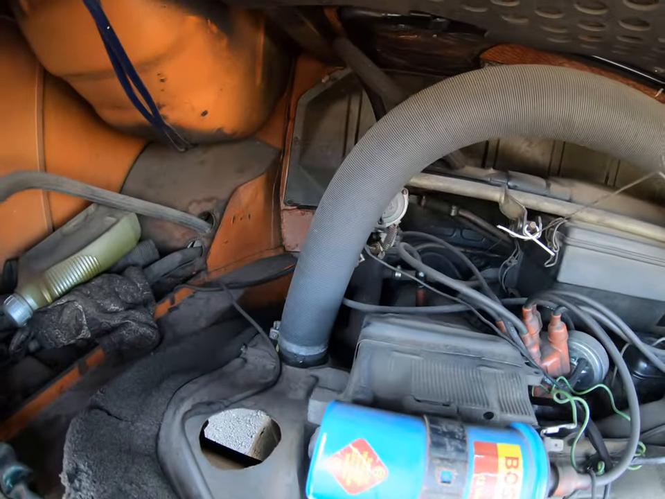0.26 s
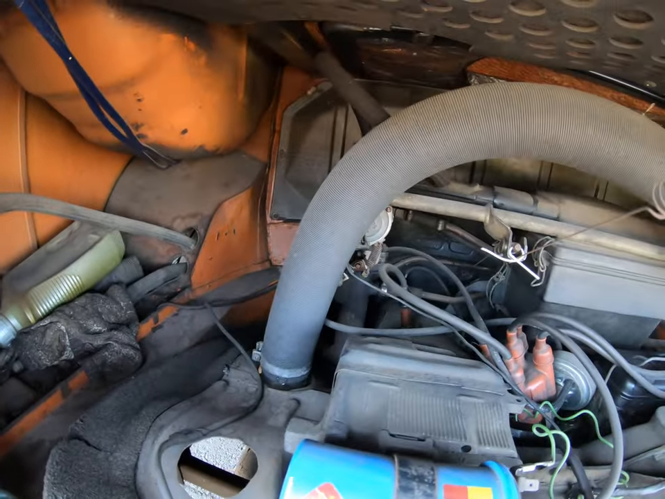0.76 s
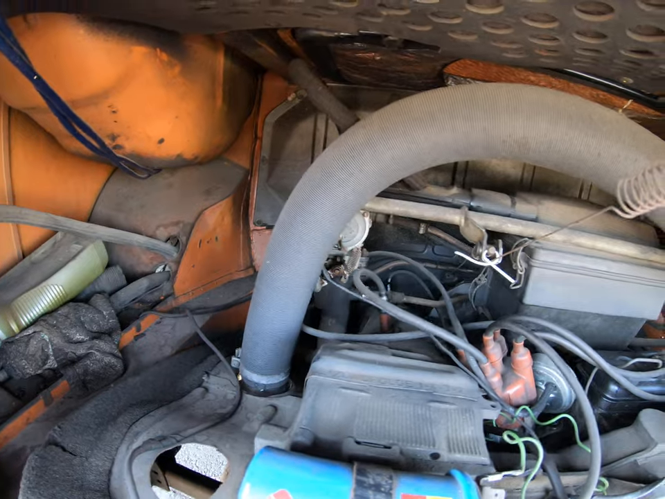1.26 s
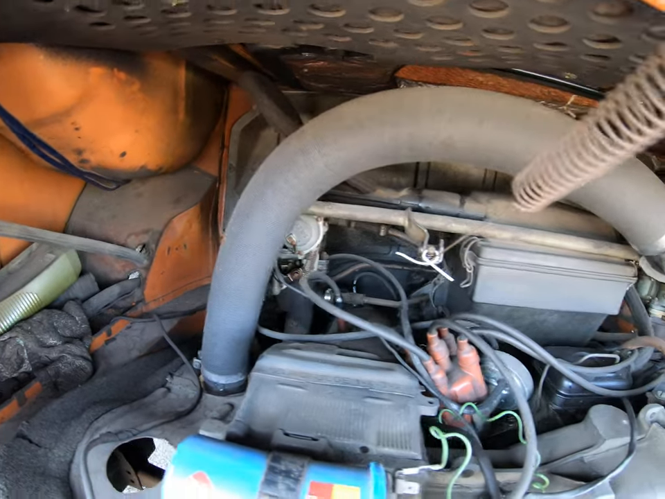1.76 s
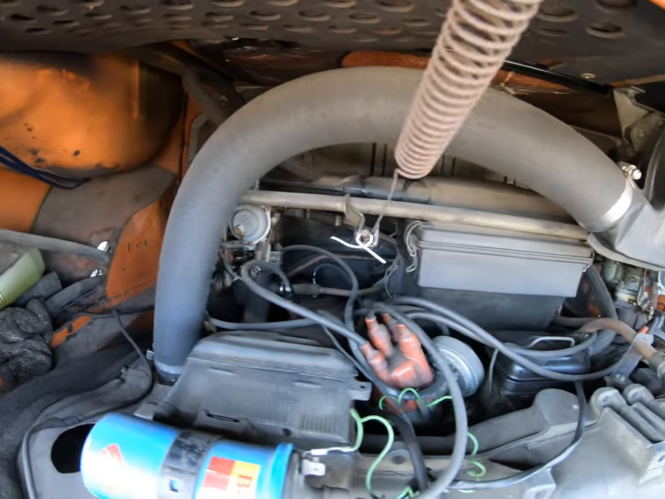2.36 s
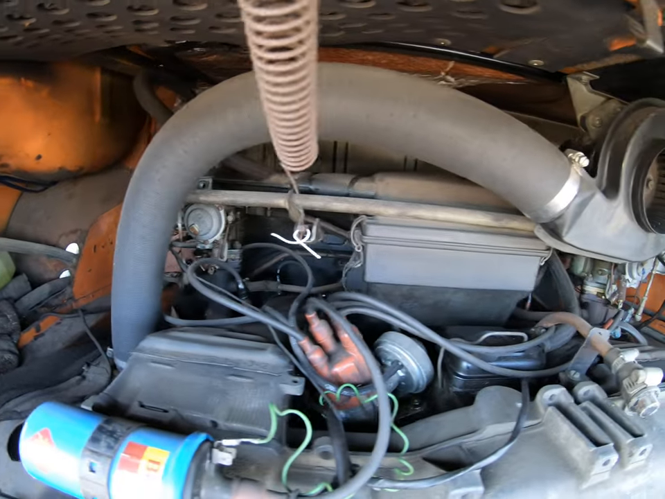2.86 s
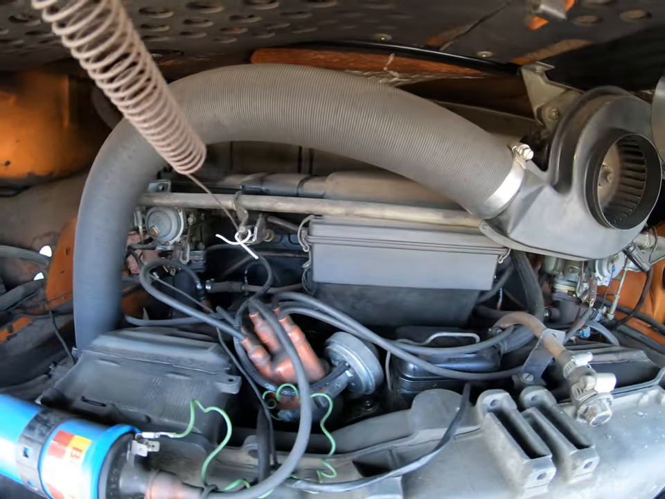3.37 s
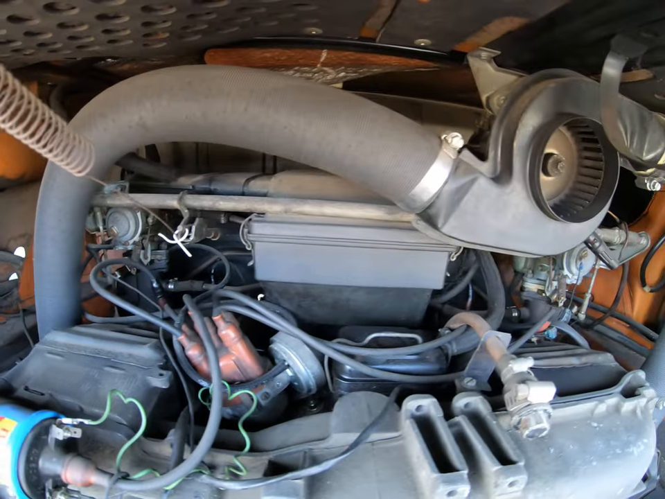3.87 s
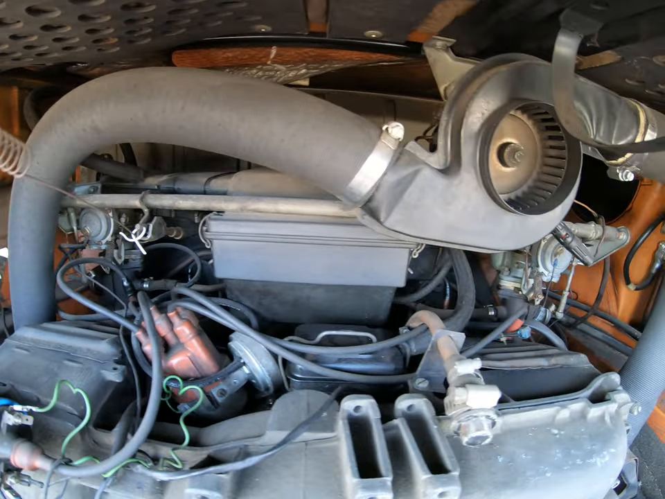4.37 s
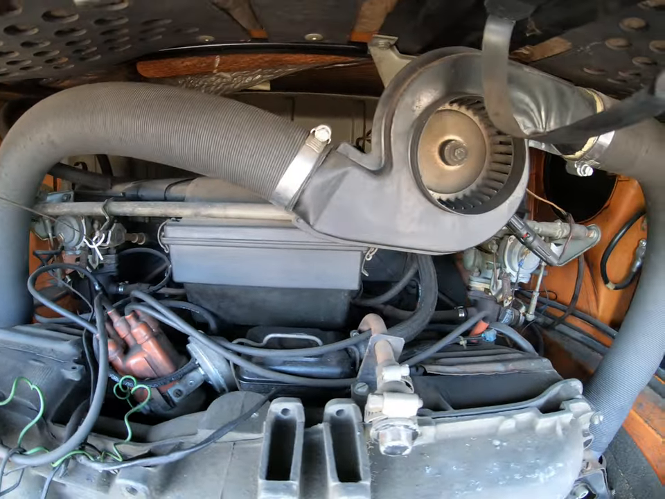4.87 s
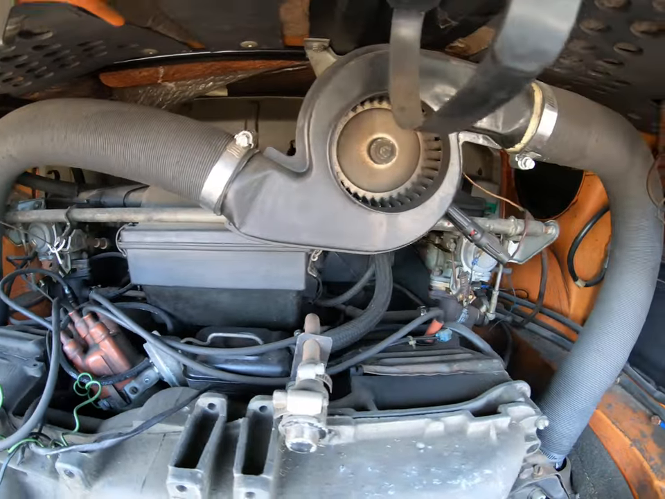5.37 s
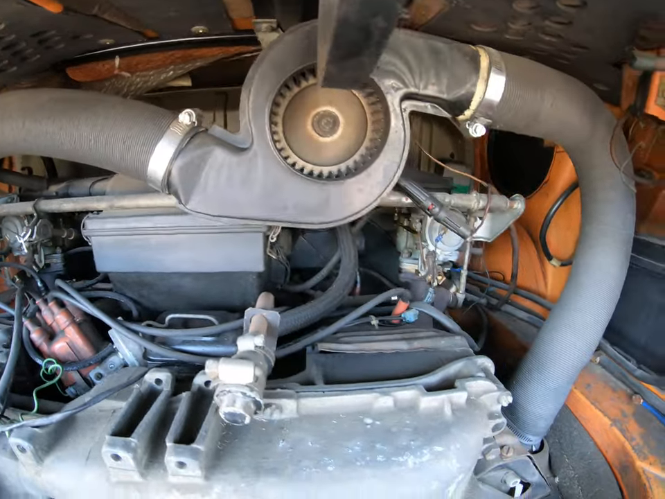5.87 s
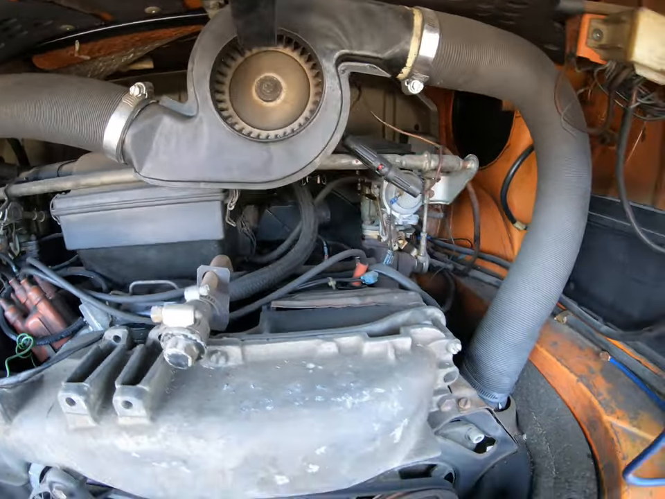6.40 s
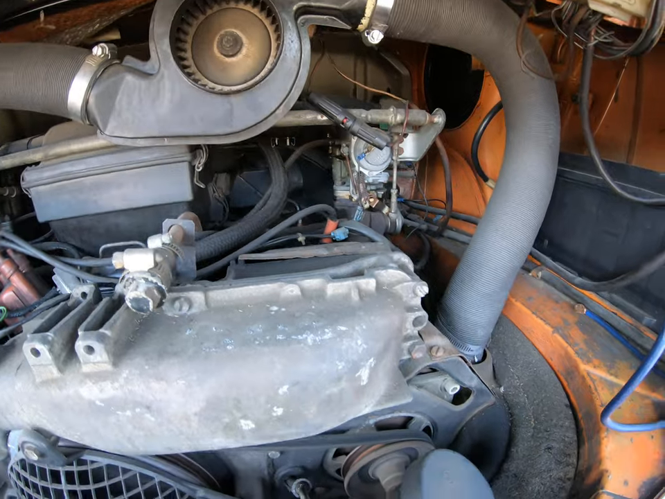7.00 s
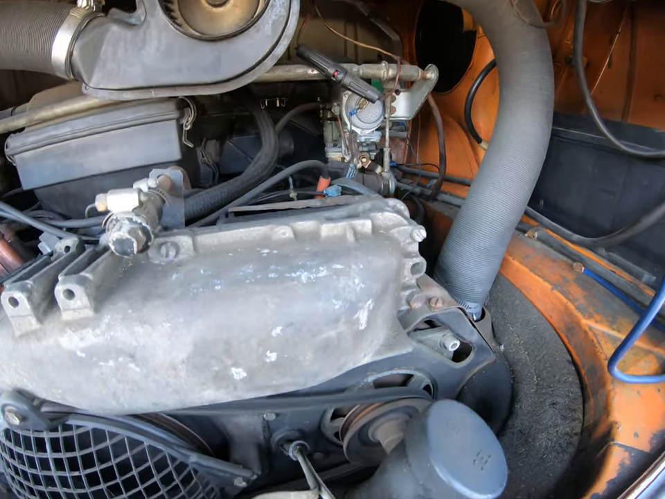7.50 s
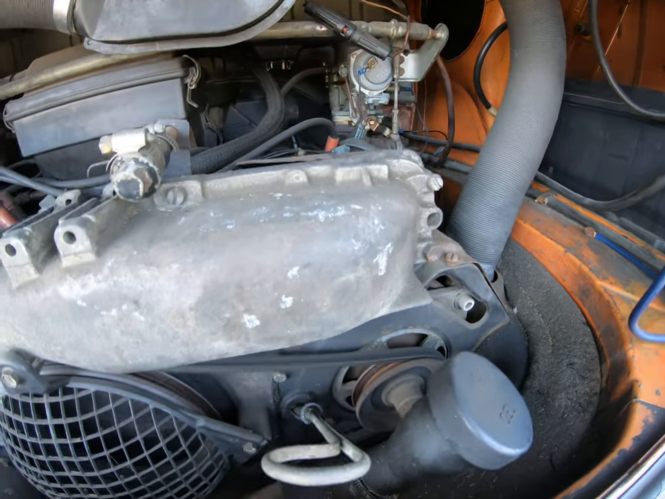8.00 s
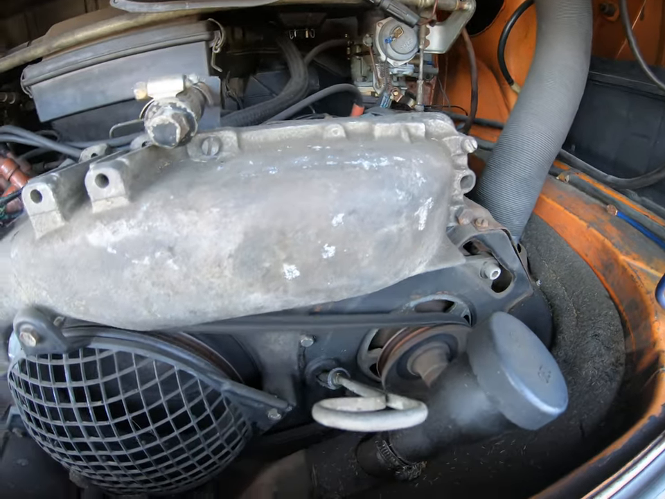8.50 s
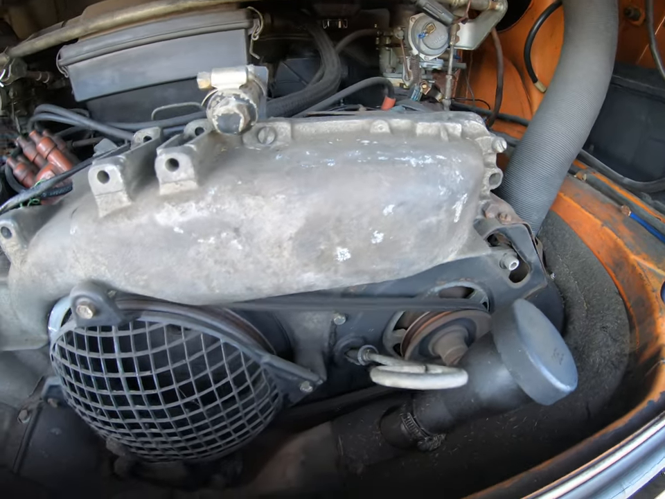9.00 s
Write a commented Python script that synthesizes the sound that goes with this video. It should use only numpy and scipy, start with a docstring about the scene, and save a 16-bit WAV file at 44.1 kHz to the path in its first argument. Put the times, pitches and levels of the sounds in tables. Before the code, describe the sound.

An air-cooled flat-four engine is already running at a fast, steady idle in an open engine bay. Low, slightly lumpy exhaust throb sits under dense valve clatter, dull knocks and bright tappet ticks. A cooling fan hums and whines through rushing air. The stereo microphone drifts very close over the engine, so parts come forward and recede; the engine never stops.

```python
"""Open engine bay, heard from very close: an air-cooled flat-four petrol engine idles fast.
Four exhaust puffs a cycle throb through silencer resonances; the cooling fan hums and whines as sines locked
to the crank. Valve gear clatters as banded noise patterns that recur each cycle and slowly change.
Pistons knock and valves and two loose tappets strike as clicks into resonances; cooling air rushes low.
The microphone drifts slowly over the engine, so parts come forward and recede."""
import sys
import numpy as np
from scipy import signal
from scipy.io import wavfile
from scipy.ndimage import map_coordinates

SR = 44100
rng = np.random.default_rng(int(sys.argv[2]) if len(sys.argv) > 2 else 0)


def transcribe(u):
    """Save the signal u as a 16-bit wav file named by the first command-line argument.

    u: samples, shape (n,) or (channels, n), limited to [-1, 1]; the rate is SR.
    q: integer samples, one column per channel.
    """
    v = np.clip(np.atleast_2d(u).T, -1, 1)
    q = np.round(v * 32767).astype(np.int16)
    wavfile.write(sys.argv[1], SR, q)


N = 407925

# Exhaust puffs reaching the silencer. Each row: place in the two-turn cycle (0-1), relative strength.
EXHAUST_PUFFS = [(0.052, 1.315), (0.256, 0.56), (0.558, 0.99), (0.744, 1.267)]
# Silencer and pipe resonances. Each row: centre in Hz, width in Hz, signed gain.
SILENCER_MODES = [(38, 8.3, -0.023), (56.3, 11.5, -0.07), (93.2, 45.7, -0.064), (111.75, 8.63, 0.21),
                  (166.6, 5, 0.025), (217.6, 113, 0.0047)]
# Side of the exhaust. Each row: time in seconds, left minus right in dB.
EXHAUST_SIDE = [(0, -.45), (2, -.4), (5.5, .3), (9.25, .3)]


def exhaust(cycle, cycle_hz, outlet_hz=35.8, uneven_db=0.48, order_count=22):
    """Puff train summed by order through the silencer modes; the outlet radiates little deep bass."""
    place, strength = np.transpose(EXHAUST_PUFFS)
    turn = np.exp(2j * np.pi * cycle)
    out, wave = 0, 1
    for order in range(1, order_count + 1):
        hz = order * cycle_hz
        wave = wave * turn
        pipe = sum(gain / (1 + 1j * (hz * hz - mode_hz * mode_hz) / (hz * width_hz))
                   for mode_hz, width_hz, gain in SILENCER_MODES)
        puffs = np.sum(strength * np.exp(-2j * np.pi * order * place))
        outlet = (hz / (hz - 1j * outlet_hz)) ** 2
        out = out + (wave * (puffs * pipe * outlet)).real
    uneven_burn = from_db(uneven_db * drift(40))
    return out * uneven_burn * pan(in_time(EXHAUST_SIDE))


# Clatter colour. Each row: frequency in Hz, relative density in dB per Hz.
CLATTER_COLOUR = [(170, -8), (265, -1.5), (420, -4.5), (520, -1.5), (740, -2), (1100, -7), (1600, -4),
                  (1900, -8.5), (2900, -5.5), (5000, -14.5), (7000, -15), (9000, -28.5), (11500, -39.5),
                  (14500, -48)]
# Parts passed by the microphone: cooling air, blower housing, fan shroud, fan intake, valve gear,
# crankcase top, left cylinders' hiss.
# Each row: centre in Hz, spread in octaves, gain in dB, closest in seconds, dwell in seconds.
PART_PASSES = [(315, 0.7, 3.5, 5.6, 3.1), (770, 0.29, 2.5, 5.6, 0.66), (1580, 0.68, 4, 8.5, 1.6),
               (750, 0.19, 2, 8.9, 1.4), (3120, 0.24, 1.8, 11.5, 6.4), (5000, 0.95, 2, 4.15, 0.48),
               (9000, 0.68, 1.5, 0.7, 2.2)]
# Stereo likeness. Each row: frequency in Hz, left-right correlation (clipped to -1..1 in use).
STEREO_LIKENESS = [(150, 0.4), (320, 1.13), (640, 0.66), (1300, 0.03), (3000, 0.78), (5000, 0.5), (7000, 0),
                   (12000, -0.5)]
# Stereo balance, also for the knocks. Each row: frequency in Hz, left minus right in dB.
STEREO_BALANCE = [(200, -2), (600, 5), (950, -7.5), (1400, -1), (2000, -1.5), (3500, -0.5), (6000, -1),
                  (8500, 5), (13000, 4)]
# Crankcase and cooling-tin modes.
# Each row: centre in Hz, width in Hz, level in dB, closest in seconds, dwell in seconds.
TIN_MODES = [(800, 120, -12, 5.3, 1.1), (960, 390, -5.5, 2.3, 2.3), (1247, 63, 2, 4.8, 1.8),
             (1270, 43, -7, 7, 0.61), (1690, 150, 4.5, 0.17, 0.46), (2840, 190, 1, 1.5, 1.5),
             (3340, 80, 1, 5.05, 0.39), (3780, 540, -5, 5.52, 0.38), (5640, 300, -3, 4.7, 0.39),
             (6400, 400, -3, 2.1, 4.3), (8000, 540, -36, 3.5, 0.49), (10150, 510, 2, 1.3, 9.1)]


def clatter(cycle, level_db=-22.5, memory_at_1khz_cycles=13.05, loose_hz=6400.0, repeat_share=1.0,
            turbulent_hz=580.0, patchy_db=.5, flutter_db=0.15):
    """Valve gear, pistons and air: middle bands mostly repeat each cycle, low rush and high hiss are fresh noise."""
    centre_hz, spread_octaves = np.transpose(PART_PASSES)[:2]
    nearness_db = np.array([db * passing(closest_s, dwell_s) for _, _, db, closest_s, dwell_s in PART_PASSES])
    edges_hz = np.geomspace(160, 16000, 21)
    hiss = rng.standard_normal((2, 2, N))
    flutter = flutter_db * drift(35)  # common to all bands
    out = 0
    for k, (low_hz, high_hz) in enumerate(zip(edges_hz, edges_hz[1:])):
        hz = np.sqrt(low_hz * high_hz)
        share = repeat_share / (1 + (hz / loose_hz) ** 2 + (turbulent_hz / hz) ** 2)
        share = np.clip(share, 0, 1)
        # short waves change pattern soonest as the microphone moves
        rattle = repeating_rattle(cycle, memory_at_1khz_cycles * 1000 / hz)
        drive = np.sqrt(share) * rattle + np.sqrt(1 - share) * hiss[k % 2]
        drive = drive * stroke_envelope(cycle, hz)
        band = signal.butter(2, [low_hz, high_hz], "band", fs=SR, output="sos")
        mid, side = signal.sosfilt(band, drive)
        root_width = np.sqrt(high_hz - low_hz)
        mid, side = root_width * rms_one(mid), root_width * rms_one(side)
        near_db = np.exp(-.5 * (np.log2(hz / centre_hz) / spread_octaves) ** 2) @ nearness_db
        gain = from_db(at_hz(CLATTER_COLOUR, hz) + near_db + patchy_db * drift(1.56) + flutter)
        alike = np.clip(at_hz(STEREO_LIKENESS, hz), -1, 1)
        pair = np.sqrt(1 + alike) * mid + np.sqrt(1 - alike) * side * [[1], [-1]]
        out = out + gain * pair * pan(at_hz(STEREO_BALANCE, hz))
    tins = sum(from_db(db) * passing(closest_s, dwell_s) * resonate(out, hz, width_hz)
               for hz, width_hz, db, closest_s, dwell_s in TIN_MODES)
    return from_db(level_db) * rms_one(engine_bay(out + tins))


def repeating_rattle(cycle, memory_cycles, size=40):
    """Two fine contact patterns, recurring every cycle, that turn into new ones over memory_cycles."""
    steps, count = int(N / cycle[-1]), int(cycle[-1]) + 1
    patterns = rng.standard_normal((2, size, 4096), dtype=np.float32)[:, :, :steps]
    progress = np.arange(count)[:, None] / max(memory_cycles, count / size)
    blend = np.exp(-(progress + 1 - np.arange(size)) ** 2)
    blend /= np.linalg.norm(blend, axis=1, keepdims=True)
    unrolled = (blend.astype(np.float32) @ patterns).reshape(2, -1)
    return unrolled[:, (cycle * steps).astype(int)]


# Rattles and rushes of each cycle. Each row: place in the cycle (0-1), rise in cycles, decay in cycles,
# level over the steady churn in dB, centre in Hz, spread in octaves.
CYCLE_STROKES = [(.18, 0.014, 0.069, 5.5, 6560, 0.33), (.19, 0.016, 0.23, 1.5, 1660, 0.19),
                 (.35, 0.0084, 0.031, -8.5, 1800, 1.3), (.355, .012, 0.043, 4, 10000, 0.76),
                 (.5, 0.029, 0.025, -6, 3240, 1), (.69, 0.016, 0.22, -4, 1810, 0.26),
                 (.71, 0.08, 0.047, 5.5, 9350, 0.79), (.73, 0.22, 0.013, 2, 265, 0.36),
                 (.925, 0.007, 0.018, 2.5, 4500, 0.74), (.935, 0.018, 0.099, -5, 1370, 0.33)]


def stroke_envelope(cycle, hz, size=512):
    """Swell and decay of one cycle's rattles in the band at hz; rms 1 over the cycle."""
    grid, power = np.linspace(0, 1, size), 1
    for place, rise, decay, db, centre_hz, spread_octaves in CYCLE_STROKES:
        since = (grid - place + .5) % 1 - .5
        shape = np.exp(np.where(since < 0, -(since / rise) ** 2, -since / decay))
        colour = np.exp(-.5 * (np.log2(hz / centre_hz) / spread_octaves) ** 2)
        power = power + shape * from_db(db) ** 2 * colour
    return np.interp(cycle % 1, grid, rms_one(np.sqrt(power)))


def engine_bay(x, echo_db=-19.5, nearest_s=.003, farthest_s=.016, sway_s=0.00018, count=6):
    """Steel walls return early echoes whose paths slowly change: a fine, moving comb."""
    out, now = x, np.arange(N)
    for k, lag_s in enumerate(np.geomspace(nearest_s, farthest_s, count)):
        sent = (now - SR * (lag_s + sway_s * drift(.6))).astype(int).clip(0, N - 1)
        out = out + (-1) ** k * from_db(echo_db - k) * x[:, sent]  # later echoes weaker
    return out


# Fan and drive tones. Each row: beats per cycle, level at the closest point in dB, closest in seconds,
# dwell in seconds, lag of the right side in radians, roughness (0-1).
FAN_TONES = [(40, -27.8, 4.1, 2.4, 0.47, .2), (55, -33.5, 1.0, 1.5, 1, .5),
             (56, -34.8, 4.9, 1.1, 0.23, .55), (52, -36.5, 5.9, 1.1, 0.51, .4),
             (74, -36.8, 1.8, 1.2, .9, .45), (70, -40, 2.9, 2.0, .6, .5), (68, -39.5, 4.8, .9, .6, .5),
             (64, -38, 5.5, .8, .5, .55), (60, -40.5, 5.2, .7, .5, .7)]


def fan(cycle, throb=0.13, gusts_per_s=45.0):
    """Crank-locked hum and whines fall off with distance, swell four times a cycle, roughened by eddies."""
    out = 0
    for beats, db, closest_s, dwell_s, right_lag_rad, rough in FAN_TONES:
        distance = np.hypot(1, (np.arange(N) / SR - closest_s) / dwell_s)
        eddies = rough * drift(gusts_per_s)
        tone = blade_tone(beats * cycle + eddies / (2 * np.pi), right_lag_rad)
        level_wobble = 1 + .5 * eddies[::-1]  # reversed: independent of the phase wobble
        out = out + from_db(db) / distance * level_wobble * tone
    return out * (1 + throb * np.cos(8 * np.pi * cycle))


def blade_tone(beats, right_lag_rad):
    """Sine counted in beats, reaching the right side later; rms 1."""
    return np.sqrt(2) * np.sin(2 * np.pi * beats - np.array([[0], [right_lag_rad]]))


# Combustion and piston knocks, each in its own part of the casing; the last row is a sharp tappet tick near 4
# kHz. # Each row: place in the cycle (0-1), centre in Hz, width in Hz, peak in dB, closest in seconds, dwell in
# seconds.
CASING_KNOCKS = [(.92, 960, 83, -25, 1.84, 2.2), (.905, 1475, 310, -20.5, 2.1, 2),
                 (0.3, 1420, 130, -29, 1, 1.1), (.205, 1240, 86, -27.5, 3, 1.7),
                 (0.8, 813, 160, -26, 5.2, 1.8), (.345, 883, 230, -22, 5.4, 1.3),
                 (.17, 1225, 180, -25, 8.5, 1.5), (0.91, 1300, 150, -22.5, 8.7, 2.3),
                 (0.4, 3000, 370, -31, 9.3, 1.3), (.17, 4030, 120, -23.5, 2.6, 0.62)]


def knocks(cycle, uneven_db=1.0, sides_db=9.0, jitter_s=0.000091):
    """Each knock swells and dies in a casing resonance, nearly the same from cycle to cycle."""
    out = 0
    for place, hz, width_hz, db, closest_s, dwell_s in CASING_KNOCKS:
        at = once_a_cycle(cycle, place)
        at = (at + jitter_s * SR * rng.standard_normal(len(at))).astype(int)
        blows = clicks(at, db + uneven_db * rng.standard_normal(len(at))) * passing(closest_s, dwell_s)
        knock = resonate(resonate(blows + 1e-18, hz, width_hz), hz, width_hz)
        knock = knock * SR * np.e / (2 * np.pi * width_hz)  # unit click peaks at 1
        out = out + knock * pan(at_hz(STEREO_BALANCE, hz) + sides_db * drift(0.14))
    return out


# Valves and rockers striking in turn. Each row: place in the cycle (0-1), level in dB, centre in Hz,
# spread in octaves, closest in seconds, dwell in seconds.
VALVE_STRIKES = [(.16, -31, 4220, 0.17, 8.5, 10), (.165, -31.5, 6970, 0.13, -2.5, 14),
                 (.2, -27, 1960, 0.22, 5, 1.6), (.33, -31.5, 2750, 0.47, 2.5, 10),
                 (.51, -29, 3080, 0.33, 9, 6.5), (.69, -28.5, 1950, .25, 7.5, 2.7),
                 (.8, -28, 3350, 0.27, 4.8, 3), (.915, -29.5, 2180, 0.61, 7.5, 3.3)]
# Touches of each closing valve or tappet. Each row: delay in seconds, level in dB.
CLOSING_BOUNCES = [(0, -4), (.0021, -3), (.0058, -4)]


def valves(cycle, t60_s=0.03, uneven_db=1.5, jitter_s=.00004, lobes_per_s=0.301, width=0.67, count=44):
    """Each valve rings many rocker-cover modes; their mix changes as the microphone drifts through lobes."""
    place, db, centre_hz, spread_octaves, closest_s, dwell_s = np.transpose(VALVE_STRIKES)[:, :, None, None]
    delay_s, bounce_db = np.transpose(CLOSING_BOUNCES)
    # axes: valve, cycle, bounce
    s = np.array([once_a_cycle(cycle, p) for p in place.ravel()])[:, :, None] / SR + delay_s
    s = s + jitter_s * rng.standard_normal(s.shape)
    force = from_db(db + bounce_db + uneven_db * rng.standard_normal(s.shape))
    force = force * np.exp(-((s - closest_s) / dwell_s) ** 2)
    at = (s * SR).astype(int).clip(0, N).ravel()
    out = np.zeros((2, N))
    for hz in np.geomspace(1150, 8600, count) * rng.uniform(.98, 1.02, count):
        lobe_turns = lobes_per_s * rng.random(place.shape) * s + rng.random(place.shape)
        lobe = np.sqrt(2) * np.sin(2 * np.pi * lobe_turns)
        blows = force * lobe * np.exp(-.5 * (np.log2(hz / centre_hz) / spread_octaves) ** 2)
        mode = ring(np.bincount(at, blows.ravel(), N + 1)[:N], hz, t60_s)
        side_rad = np.pi / 4 + width * rng.standard_normal()
        out[0] += np.sqrt(2) * np.cos(side_rad) * mode
        out[1] += np.sqrt(2) * np.sin(side_rad) * mode
    return out


# Modes struck by the loose tappets. Each row: frequency in Hz, level from the first tappet in dB,
# level from the second in dB, t60 in seconds, closest in seconds, dwell in seconds.
TAPPET_MODES = [(3620, -28, -22, 0.064, 9.3, 0.84), (3710, -21, -29, 0.038, 4.1, 0.57),
                (3750, -22, -23, 0.025, 6.23, 0.79), (4255, -25, -27, 0.041, 9.4, 2.9),
                (3980, -20, -39, 0.024, 8.4, .6), (4737, -27.5, -45, 0.06, 7.7, 1.2),
                (4650, -28, -43, 0.053, 4.3, 0.98), (4690, -26, -50, 0.032, 0.91, 1.5)]
# Closing places of the two loose tappets in the cycle (0-1).
TAPPET_PLACES = (.157, .655)


def tappets(cycle, uneven_db=-1.0, jitter_s=.00002, contact_hz=7360.0):
    """Each tappet closes with nearly the same bounces every cycle and rings the rocker cover in its own colour."""
    delay_s, bounce_db = np.transpose(CLOSING_BOUNCES)
    touches = [once_a_cycle(cycle, place)[:, None] + delay_s * SR for place in TAPPET_PLACES]
    touches = [(at + jitter_s * SR * rng.standard_normal(at.shape)).astype(int) for at in touches]
    out = np.zeros((2, N))
    for hz, first_db, second_db, t60_s, closest_s, dwell_s in TAPPET_MODES:
        lobe = passing(closest_s, dwell_s)
        for channel in out:
            blows = 0
            for at, db in zip(touches, (first_db, second_db)):
                blow_db = db + bounce_db + uneven_db * rng.standard_normal(at.shape)
                blows = blows + clicks(at.ravel(), blow_db.ravel())
            channel += ring(lobe * blows, hz, t60_s)
    oil_film = signal.butter(2, contact_hz, fs=SR, output="sos")  # softens the blow
    return signal.sosfilt(oil_film, out)


def rumble(level_db=-33.5, low_hz=55.0, high_hz=226.0, apart_db=-14.5):
    """Turbulent cooling air: soft low band of noise, nearly alike on both sides."""
    band = signal.butter(2, [low_hz, high_hz], "band", fs=SR, output="sos")
    mid, side = rms_one(signal.sosfilt(band, rng.standard_normal((2, N))))
    return from_db(level_db) * (mid + from_db(apart_db) * side * [[1], [-1]])


def from_db(db):
    """Decibels to gain."""
    return np.exp(np.asarray(db) * np.log(10) / 20)


def pan(left_minus_right_db):
    """Left and right gains for a level difference in dB."""
    return from_db(left_minus_right_db * np.array([[.5], [-.5]]))


def rms_one(x):
    """Scale to unit rms."""
    return x / np.sqrt(np.mean(x ** 2) + 1e-20)


def in_time(rows):
    """Curve of (seconds, value) rows, sample by sample."""
    s, value = np.transpose(rows)
    return np.interp(np.arange(N) / SR, s, value)


def at_hz(points, hz):
    """Read a spectrum on a log-frequency axis."""
    point_hz, value = np.transpose(points)
    return np.interp(np.log(hz), np.log(point_hz), value)


def drift(rate_per_s):
    """Smooth random curve of spread about 1, changing about rate_per_s times a second."""
    knots = rng.standard_normal(1024)
    coarse = map_coordinates(knots, [np.linspace(0, rate_per_s * N / SR, 4096)], order=3, mode="wrap")
    return np.interp(np.arange(N), np.linspace(0, N, len(coarse)), coarse)


def passing(closest_s, dwell_s):
    """Strength of a part's or mode's lobe as the microphone drifts through it."""
    return np.exp(-((np.arange(N) / SR - closest_s) / dwell_s) ** 2)


def resonate(x, hz, width_hz):
    """Resonance with gain 1 on top."""
    r = np.exp(-np.pi * width_hz / SR)
    zeros = np.array([1, 0, -1]) * (1 - r * r) / 2
    return signal.lfilter(zeros, [1, -2 * r * np.cos(2 * np.pi * hz / SR), r * r], x)


def ring(blows, hz, t60_s):
    """A unit click sets a decaying sine of height 1 ringing."""
    r = np.exp(-np.log(1000) / (t60_s * SR))
    w = 2 * np.pi * hz / SR
    return signal.lfilter([0, np.sin(w)], [1, -2 * r * np.cos(w), r * r], blows + 1e-18)


def once_a_cycle(cycle, place):
    """Samples at which the crank passes a place in its cycle."""
    return np.searchsorted(cycle, np.arange(int(cycle[-1]) + 1) + place)


def clicks(at, db):
    """Clicks of the given levels at the given samples."""
    return np.bincount(at.clip(0, N), from_db(db), N + 1)[:N]


# Engine speed, hunting a little as it creeps up. Each row: time in seconds, crankshaft speed in rpm.
CRANK_SPEED = [(0.0, 1547.4), (0.75, 1564.7), (1.15, 1553.1), (1.7, 1564.1), (2.4, 1559.3), (3.5, 1589.7),
               (4.6, 1569.9), (5.2, 1595.4), (6.35, 1589.7), (6.9, 1603.9), (7.15, 1590.4), (8.15, 1611.2),
               (9.25, 1596.1)]


def scene():
    """The crank drives all but the air rumble: one cycle is two turns."""
    cycle_hz = in_time(CRANK_SPEED) / 120
    cycle = np.cumsum(cycle_hz) / SR
    engine = exhaust(cycle, cycle_hz.mean()) + clatter(cycle) + fan(cycle)
    strikes = knocks(cycle) + valves(cycle) + tappets(cycle)
    return engine + strikes + rumble()


def record(dry, cutoff_hz=15700):
    """Steep low-pass takes off the top."""
    return signal.sosfilt(signal.ellip(10, .1, 80, cutoff_hz, fs=SR, output="sos"), dry)


dry = scene()
out = record(dry)
transcribe(out)
```